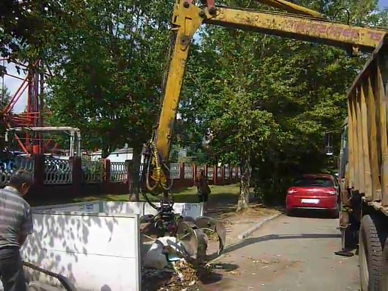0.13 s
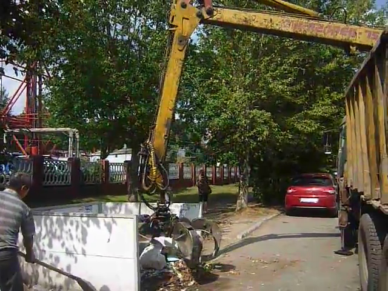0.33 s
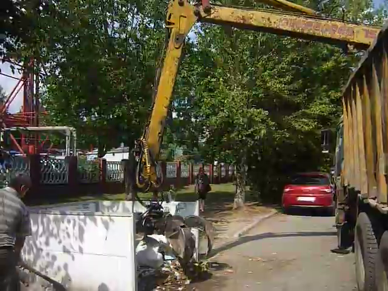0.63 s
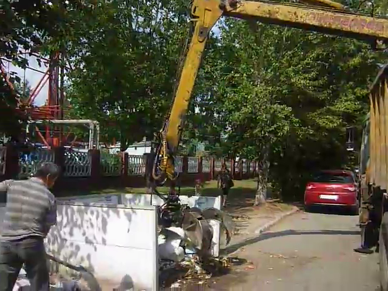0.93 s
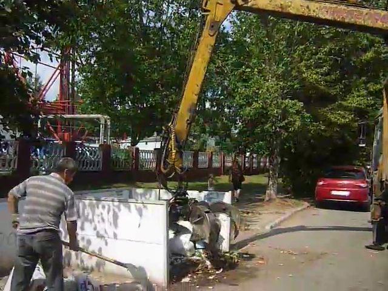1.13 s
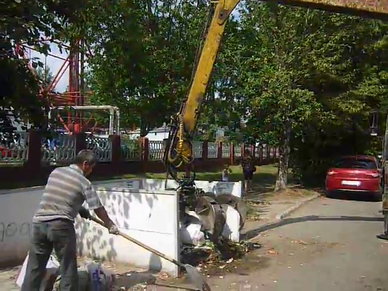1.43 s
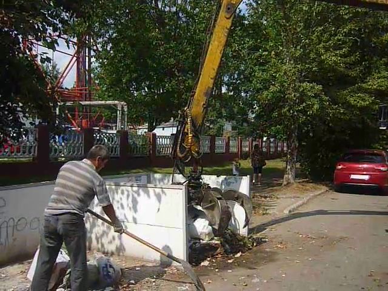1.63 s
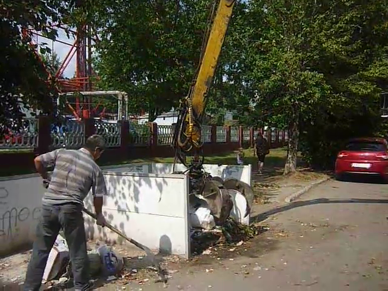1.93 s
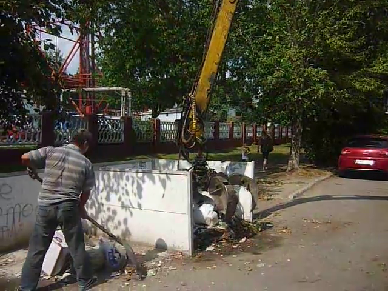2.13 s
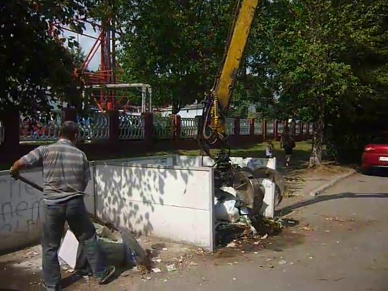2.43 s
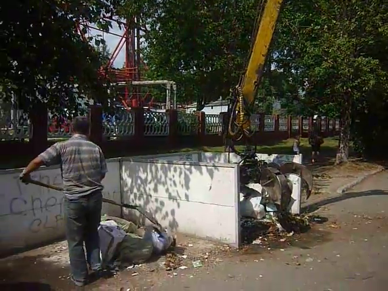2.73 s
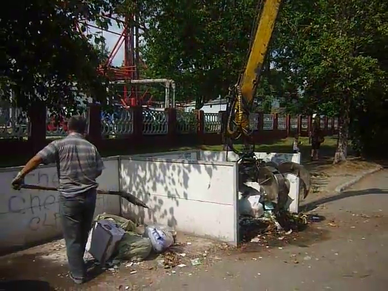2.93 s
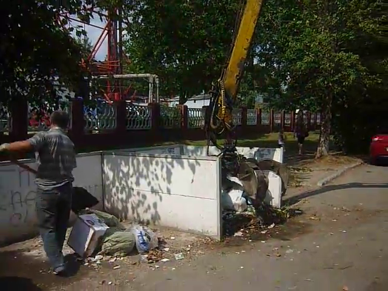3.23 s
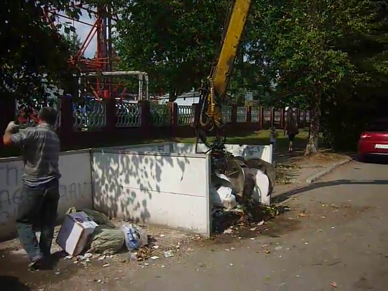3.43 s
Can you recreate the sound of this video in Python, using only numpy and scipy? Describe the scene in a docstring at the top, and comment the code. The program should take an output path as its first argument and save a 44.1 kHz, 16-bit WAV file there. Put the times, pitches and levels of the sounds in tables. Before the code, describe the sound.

A steel shovel jabs and scrapes through gritty rubble on asphalt beside a steadily running truck engine.

```python
"""A steel shovel jabs into rubble on asphalt, then is pushed through it in one long, juddering scrape.
Clicks of grit crackle under the blade and make its modes ring; a concrete bin wall throws the sound back.
Nearby a crane truck's engine runs steadily: tones on its cycle rate, banded noise and ringing panels.
Low rumble and short buffets hit the microphone, and the gain control ducks under loud bright sound."""
import sys
import numpy as np
from scipy import signal
from scipy.io import wavfile
from scipy.ndimage import uniform_filter1d

SR = 44100
rng = np.random.default_rng(int(sys.argv[2]) if len(sys.argv) > 2 else 0)


def transcribe(u):
    """Save the signal u as a 16-bit wav file named by the first command-line argument.

    u: samples, shape (n,) or (channels, n), limited to [-1, 1]; the rate is SR.
    q: integer samples, one column per channel.
    """
    v = np.clip(np.atleast_2d(u).T, -1, 1)
    q = np.round(v * 32767).astype(np.int16)
    wavfile.write(sys.argv[1], SR, q)


N = 157437   # length in samples
TIME = np.arange(N) / SR   # seconds


def from_db(db):
    """Decibels to gain."""
    return 10 ** (np.asarray(db) / 20)


def rms_one(x):
    """Scale to rms 1."""
    return x / np.sqrt(np.mean(x ** 2) + 1e-20)


def in_time(rows):
    """Interpolate rows of (seconds, value) to a curve with a value at every sample."""
    return np.interp(TIME, *np.transpose(rows))


def drift(rate_hz):
    """Smooth random wandering of rms about 1: noise through two equal low-pass poles at rate_hz."""
    step = 40   # samples between the points of the slow curve
    warm_up = 2000   # points dropped while the filter settles
    pole = np.exp(-2 * np.pi * step * rate_hz / SR)
    noise = rng.standard_normal(N // step + warm_up + 2)
    slow = signal.lfilter([1], [1, -2 * pole, pole ** 2], noise)[warm_up:]
    return np.interp(np.arange(N) / step, np.arange(len(slow)), rms_one(slow))


def butter(x, hz, kind, order=2):
    """Butterworth filter."""
    sections = signal.butter(order, hz, kind, fs=SR, output="sos")
    return signal.sosfilt(sections, x + 1e-18)


def resonate(x, hz, width_hz):
    """Ring one two-pole resonance with x, output at rms 1."""
    radius = np.exp(-np.pi * width_hz / SR)
    poles = [1, -2 * radius * np.cos(2 * np.pi * hz / SR), radius ** 2]
    return rms_one(signal.lfilter([1, 0, -1], poles, x))


def bands(sources, spectrum):
    """Split two sources by turns into third-octave bands with a spectrum's gains: centres, bands of total rms 1."""
    edges = 28 * 2 ** (np.arange(26) / 3)
    centres = np.sqrt(edges[1:] * edges[:-1])
    hz, db = np.transpose(spectrum)
    gains = from_db(np.interp(np.log(centres), np.log(hz), db))
    parts = []
    for k, gain in enumerate(gains):
        parts.append(gain * butter(sources[k % 2], edges[k:k + 2], "band"))
    parts = np.array(parts)
    return centres, parts / parts.sum(0).std()


GRAINS_PER_S, GRAIN_SPREAD_DB = 4000, 3
SCRAPE_LOW_HZ = 527   # high-pass corner


def grit():
    """Dense random clicks of stones breaking loose, a few much larger than the rest."""
    sizes = from_db(GRAIN_SPREAD_DB * np.minimum(rng.exponential(1, N), 5))
    signs = rng.choice([-1, 1], N)
    breaks_loose = rng.random(N) < GRAINS_PER_S / SR
    return butter(sizes * signs * breaks_loose, SCRAPE_LOW_HZ, "high")


# The blade bites into the rubble. Each row: start in seconds, rise in seconds, hold in seconds,
# relative level in dB, treble tilt in dB per octave.
BITES = [(0.0, 0.00067, 0.0064, -20, -2), (0.444, 0.0039, 0.028, -17, -1), (0.52, 0.017, .01, -16.5, -2.2),
         (0.561, .006, 0.017, -23, -5.5), (0.603, .006, 0.026, -14, 1.4), (0.646, 0.004, 0.0057, -19, -2.5),
         (0.67, .012, 0.024, -16.5, 1.3), (1.51, 0.0045, .004, -22, -1), (1.531, .004, 0.014, -30.5, -5.5),
         (1.568, 0.0094, 0.032, -16.5, -3.1), (1.639, 0.027, 0.026, -14, -2.3),
         (1.859, .008, .006, -18, -3), (2.027, 0.0094, 0.01, -18.5, -0.5), (2.138, 0.0092, 0.053, -24, -5),
         (2.212, .012, 0.019, -19, -1), (2.278, 0.021, 0.018, -24, -0.8)]
# Pressure on the blade in the long push. Each row: time in seconds, relative level in dB.
PUSH = [(1.66, -50), (1.71, -18), (1.755, -13.5), (1.80, -15.5), (1.83, -18), (1.86, -15), (1.91, -21),
        (1.97, -17.5), (2.01, -19), (2.075, -25.5), (2.11, -17), (2.135, -20.5), (2.18, -21), (2.21, -44),
        (2.36, -42)]
BITE_T60_S = 0.17
PUSH_TILT_DB = -0.9   # per octave


def strokes():
    """Return the power of each bite and of the push over time, and their treble tilts."""
    gains = []
    for start, rise, hold, level_db, _ in BITES:
        rising = np.clip((TIME - start) / rise, 0, 1)
        since_hold = np.maximum(TIME - start - rise - hold, 0)
        gains.append(rising * from_db(level_db - 60 * since_hold / BITE_T60_S))
    pushing = (TIME > PUSH[0][0]) * (TIME < PUSH[-1][0])
    gains.append(from_db(in_time(PUSH)) * pushing)
    tilts = np.array([row[4] for row in BITES] + [PUSH_TILT_DB])
    return (np.array(gains) + 1e-9) ** 2, tilts


# Colour of the crackling grit. Each row: frequency in Hz, relative gain in dB.
SCRAPE = [(290, -40.5), (500, -12.5), (543, -8.5), (589, -22.5), (710, 2), (789, -8), (867, 3.5), (997, -6),
          (1200, -2.5), (1520, -9.5), (1810, -2), (2040, -7.5), (2180, -7), (2960, -3.5), (6720, -6.5),
          (7730, -8.5), (8200, -15), (10700, -50), (18000, -120)]
# Ringing modes of the steel blade. Each row: frequency in Hz, width in Hz, relative level in dB.
BLADE = [(866, 110, 2.5), (1234, 110, -3), (1420, 43, -12.5), (1603, 88, 2), (1770, 90, -1),
         (1950, 52, -4.5), (2430, 140, 3), (2934, 80, 1), (3303, 46, -1), (3820, 30, 1), (3900, 65, -13),
         (4760, 90, -5), (4970, 180, 3), (6500, 260, -6.5)]
GRIT_DB, GRIT_PATCHY_DB = -3, 1.35
BLADE_DB, MODE_WANDER_DB, MODE_WANDER_HZ = -8.5, 3.5, 7.9
JUDDER_DB, JUDDER_HZ = 1.02, 52


def shovel():
    """Strokes drive juddering grit, heard directly and through blade modes that wander as the contact moves."""
    power, tilts = strokes()

    def force(hz, pivot_hz=3000):
        """Summed strength of the strokes at one pitch."""
        tilt_gains = from_db(tilts * np.log2(hz / pivot_hz))
        return np.sqrt(tilt_gains ** 2 @ power)

    crackle = np.zeros(N)
    for hz, part in zip(*bands([grit(), grit()], SCRAPE)):
        crackle += part * force(hz) * from_db(GRIT_PATCHY_DB * drift(23))
    contact = grit()
    ring = np.zeros(N)
    for hz, width_hz, db in BLADE:
        mode_gain = from_db(db + MODE_WANDER_DB * drift(MODE_WANDER_HZ))
        ring += mode_gain * resonate(contact, hz, width_hz) * force(hz)
    ring /= np.sqrt(len(BLADE))
    judder = from_db(JUDDER_DB * drift(JUDDER_HZ))
    return (from_db(GRIT_DB) * crackle + from_db(BLADE_DB) * ring) * judder


# The edge catches and one resonance of the blade rasps out. Each row: centre in seconds,
# length in seconds, frequency in Hz, width in Hz, level in dB.
RASPS = [(0.502, 0.052, 1120, 160, -26.5), (.565, 0.031, 2950, 160, -26.5), (.635, 0.029, 2800, 260, -27),
         (0.63, .05, 4240, 200, -36), (0.67, .03, 1370, 110, -30), (0.694, 0.043, 2890, 257, -23.5),
         (0.691, 0.037, 3120, 280, -30), (0.722, 0.069, 886, 60, -33), (1.59, .04, 656, 90, -27.5),
         (1.593, 0.023, 4700, 120, -28), (1.676, 0.033, 1760, 130, -23.5), (1.68, 0.041, 3800, 150, -25),
         (1.68, 0.04, 4720, 130, -22), (2.12, .16, 1270, 130, -31)]


def rasps():
    """Grit feeds a single resonance at a time under a bell-shaped swell."""
    contact = grit()
    out = np.zeros(N)
    for centre, length, hz, width_hz, db in RASPS:
        swell = np.exp(-2 * ((TIME - centre) / length) ** 2)
        out += from_db(db) * swell * resonate(contact, hz, width_hz)
    return out


# Hard knocks of the blade on stone. Each row: start in seconds, crack level in dB, thud level in dB.
KNOCKS = [(.4440, -10, -15.5), (.609, -18, -30), (1.5138, -17.5, -18), (1.582, -33, -21)]
SNAP_DB, SNAP_HZ, SNAP_T60_S = -0.5, 3220, 0.002   # level relative to the crack
CRACK_T60_S = 0.04
THUD_HZ, THUD_T60_S = 287, 0.05


def knocks():
    """A decaying-sine snap of steel on stone, a short crack of grit and a dull thud of the shaft."""
    crack = rms_one(grit()) / 2
    out = np.zeros(N)
    for start, crack_db, thud_db in KNOCKS:
        age = np.maximum(TIME - start, 0)
        snap_gain = from_db(crack_db + SNAP_DB - 60 * age / SNAP_T60_S)
        out += np.sin(2 * np.pi * SNAP_HZ * age) * snap_gain
        out += (TIME > start) * crack * from_db(crack_db - 60 * age / CRACK_T60_S)
        out += np.sin(2 * np.pi * THUD_HZ * age) * from_db(thud_db - 60 * age / THUD_T60_S)
    return out


# Echoes off the ground and walls. Each row: delay in seconds, level in dB.
ECHOES = [(.009, -12), (.021, -17.5), (.034, -10)]
YARD_DB, YARD_T60_S = -9, 0.37   # diffuse tail


def yard(x):
    """Add a few dulled early echoes off ground and walls, and a diffuse tail of decaying noise."""
    dulled = butter(x, 4200, "low", order=1)
    early = np.zeros(N)
    for delay, db in ECHOES:
        early += from_db(db) * np.interp(TIME - delay, TIME, dulled, left=0)
    tail = rng.standard_normal(SR // 2) * from_db(-60 * TIME[:SR // 2] / YARD_T60_S)
    diffuse = signal.fftconvolve(x, tail / np.linalg.norm(tail))[:N]
    return x + early + from_db(YARD_DB) * diffuse


# Engine tones. Each row: multiple of the cycle rate, level in dB (rms).
ORDERS = [(5, -47.5), (7, -49), (9, -40.5), (13, -45.5), (16, -34.5), (21, -43), (22, -39), (26, -38),
          (31, -44.5), (44, -49), (50, -42), (62, -46.5)]
# Colour of the engine's noise. Each row: frequency in Hz, relative gain in dB.
ENGINE = [(18, -51), (30, -25.5), (86, -6.5), (122, -4), (158, -2), (219, -3), (349, -10), (519, -12),
          (570, -18), (626, -11.5), (688, -20.5), (773, -10.5), (1050, -15.5), (1880, -20), (2160, -22),
          (5380, -27.5), (8000, -33), (10400, -71), (17600, -120)]
# Level of that noise above the bass. Each row: time in seconds, change in dB.
ENGINE_LEVEL = [(0, 0.5), (.25, 0), (.42, 1), (.7, 5), (1.0, 0.5), (1.25, .3), (1.45, 2.5), (1.8, -1),
                (2.4, -1), (2.7, .3), (3.0, -0.5), (3.35, 0.7), (3.57, -1.5)]
# Resonances of the engine block and panels. Each row: frequency in Hz, width in Hz, level in dB.
PANELS = [(445, 37, -43), (644, 25, -41), (802, 180, -41.5), (950, 170, -41.5), (1131, 26, -46),
          (1680, 120, -53.5), (1856, 38, -45)]
CYCLE_HZ, SPEED_WANDER = 10.375, 0.0032   # one cycle is two turns of the crank; wander is a fraction
ENGINE_DB, CLATTER_DB, ENGINE_FLICKER_DB = -29, -0.5, 0.5
ENGINE_BASS_HZ = 300


def engine():
    """Tones on multiples of the wandering cycle rate, with noise and panels pulsing once per firing."""
    speed_hz = CYCLE_HZ * (1 + SPEED_WANDER * drift(2.02))
    phase = 2 * np.pi * np.cumsum(speed_hz) / SR
    tones = np.zeros(N)
    for multiple, db in ORDERS:
        start_phase = rng.uniform(0, 2 * np.pi)
        tones += np.sqrt(2) * from_db(db) * np.sin(multiple * phase + start_phase)
    firing = np.cos(8 * phase)   # eight firings per cycle
    pulsing = from_db(CLATTER_DB * firing)
    level_db = in_time(ENGINE_LEVEL)
    noise = np.zeros(N)
    for hz, part in zip(*bands(rng.standard_normal((2, N)) * pulsing, ENGINE)):
        flicker_db = ENGINE_FLICKER_DB * drift(8.9)
        noise += part * from_db(flicker_db + level_db * (hz > ENGINE_BASS_HZ))
    panels = np.zeros(N)
    for hz, width_hz, db in PANELS:
        panels += from_db(db) * resonate(rng.standard_normal(N) * pulsing, hz, width_hz)
    return tones + from_db(ENGINE_DB) * noise + panels


# Buffets on the microphone. Each row: centre in seconds, peak level in dB, pitch in Hz.
BUFFETS = [(1.934, -12.5, 370), (2.765, -8.5, 248), (2.91, -14.5, 212), (2.944, -15, 190),
           (3.035, -13.5, 218), (3.051, -10.5, 226), (3.268, -18, 250), (3.349, -15, 220),
           (3.393, -15, 240), (3.449, -12, 190)]
BUFFET_CYCLES = 0.5   # standard deviation of the bell, in cycles of the pitch


def buffets():
    """Each buffet is a dull thump of about one and a half swings: a cosine under a bell curve."""
    out = np.zeros(N)
    for centre, db, hz in BUFFETS:
        cycles = (TIME - centre) * hz
        bell = np.exp(-0.5 * (cycles / BUFFET_CYCLES) ** 2)
        out += from_db(db) * bell * np.cos(2 * np.pi * cycles)
    return out


# Level of the low rumble's core. Each row: time in seconds, level in dB.
RUMBLE_LEVEL = [(0, -64), (.25, -38), (.46, -27), (.7, -30.5), (1.05, -33), (1.4, -33.5), (1.55, -25),
                (1.8, -38.5), (2.1, -27), (2.65, -51.5), (2.9, -31.5), (3.25, -33.5), (3.37, -21.5),
                (3.46, -32), (3.52, -30), (3.57, -22)]
RUMBLE_LOW_HZ, RUMBLE_HIGH_HZ = 135, 289
RUMBLE_SKIRT_DB, SKIRT_LOW_HZ, SKIRT_HIGH_HZ = -5.5, 65, 700   # level relative to the core


def rumble(lumpy_db=1.5):
    """Lumpy low noise with a wider, weaker skirt, swelling and sinking."""
    core = rms_one(butter(rng.standard_normal(N), [RUMBLE_LOW_HZ, RUMBLE_HIGH_HZ], "band"))
    skirt = rms_one(butter(rng.standard_normal(N), [SKIRT_LOW_HZ, SKIRT_HIGH_HZ], "band"))
    level = from_db(in_time(RUMBLE_LEVEL) + lumpy_db * drift(23))
    return (core + from_db(RUMBLE_SKIRT_DB) * skirt) * level


def scene():
    """Shovel echoing in the yard, the engine nearby, and low noise at the microphone; one channel."""
    shovel_in_yard = yard(shovel() + rasps() + knocks())
    return (shovel_in_yard + engine() + buffets() + rumble())[None]


AGC_SENSE_HZ, AGC_THRESHOLD_DB = 695, -27.5   # only sound above this pitch is sensed
AGC_SLOPE = 0.49   # dB of ducking per dB over the threshold
AGC_ATTACK_S, AGC_RELEASE_DB_PER_S = 0.012, 21.5
CUTOFF_HZ = 9500
OFFSET = -0.04   # steady bias of the recorder's input


def record(dry):
    """The gain control ducks quickly under loud bright sound and recovers slowly; the top is cut."""
    sensed = butter(dry[0], AGC_SENSE_HZ, "high")
    level_db = 10 * np.log10(uniform_filter1d(sensed ** 2, size=441) + 1e-12)   # 10 ms mean
    over_db = AGC_SLOPE * np.maximum(level_db - AGC_THRESHOLD_DB, 0)
    # hold each peak and let it fall at the release rate
    fall_db = AGC_RELEASE_DB_PER_S * TIME
    held_db = np.maximum.accumulate(over_db + fall_db) - fall_db
    pole = np.exp(-1 / (AGC_ATTACK_S * SR))
    duck_db = signal.lfilter([1 - pole], [1, -pole], held_db)
    ducked = dry * from_db(-duck_db)
    soft = butter(ducked, 8120, "low", order=8)
    steep_cut = signal.cheby2(14, 70, CUTOFF_HZ, fs=SR, output="sos")
    return signal.sosfilt(steep_cut, soft) + OFFSET


dry = scene()
out = record(dry)
transcribe(out)
```